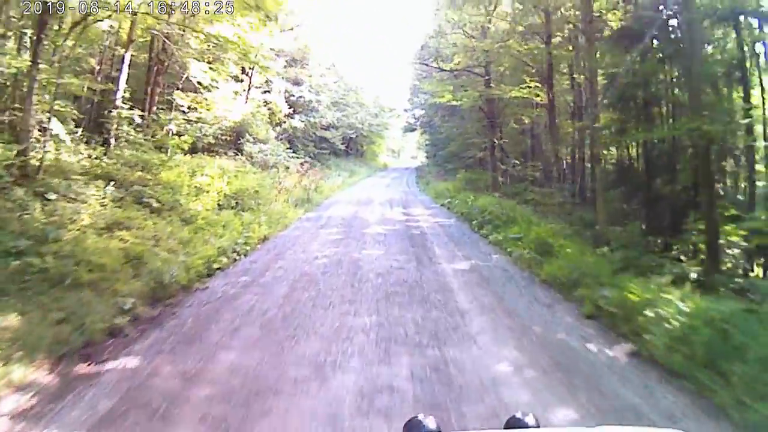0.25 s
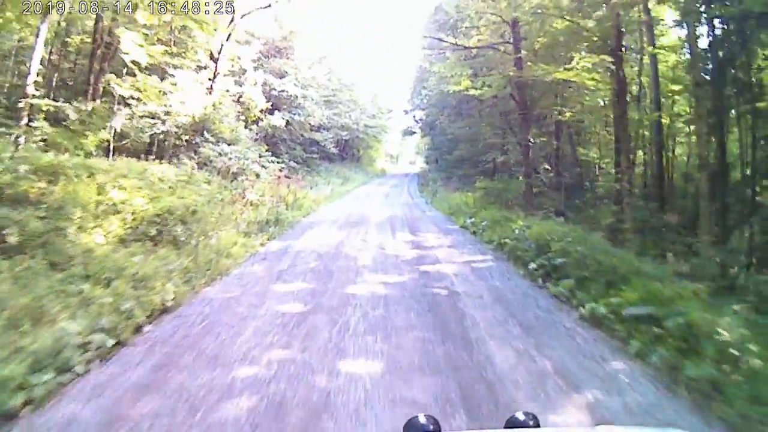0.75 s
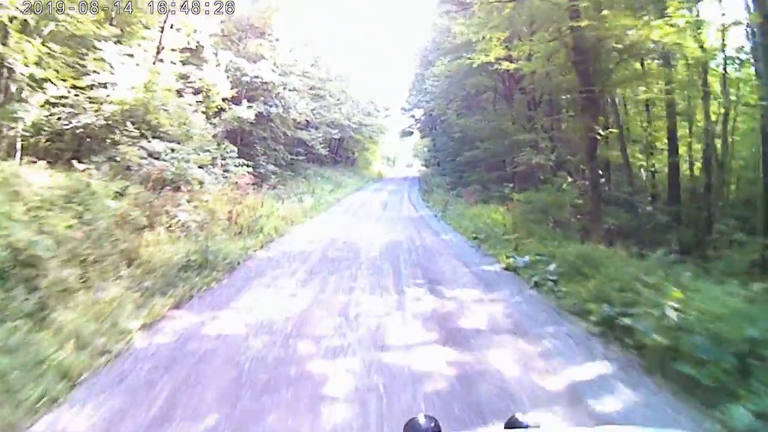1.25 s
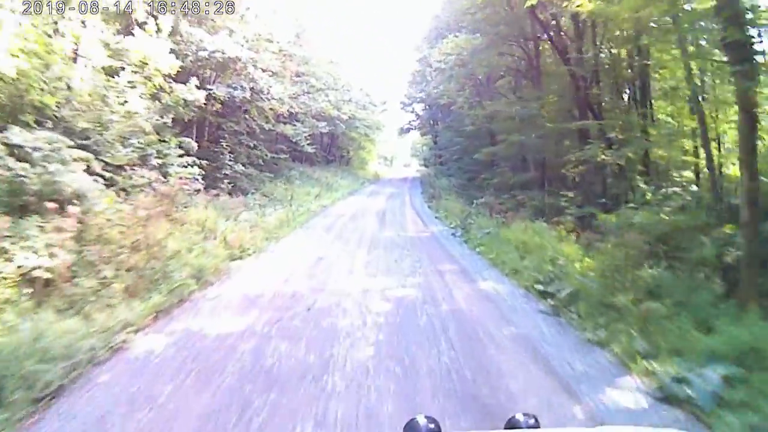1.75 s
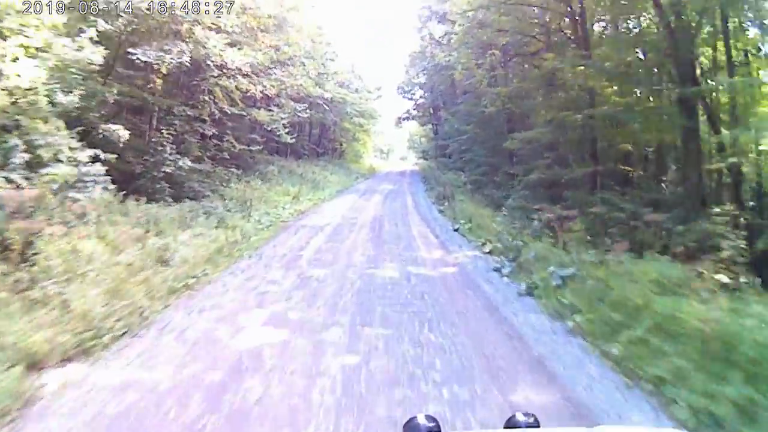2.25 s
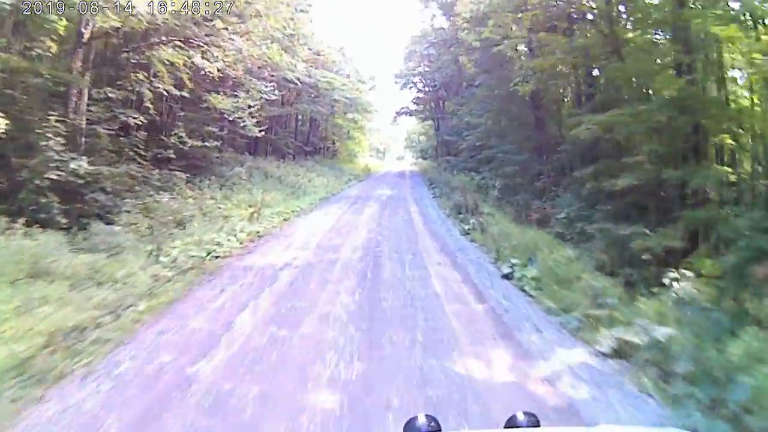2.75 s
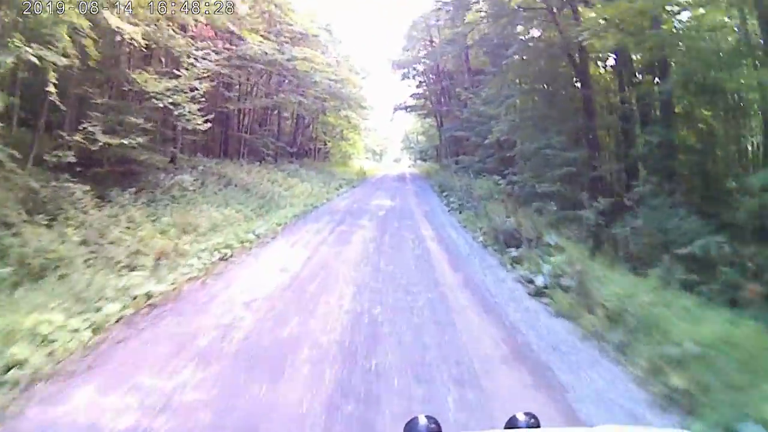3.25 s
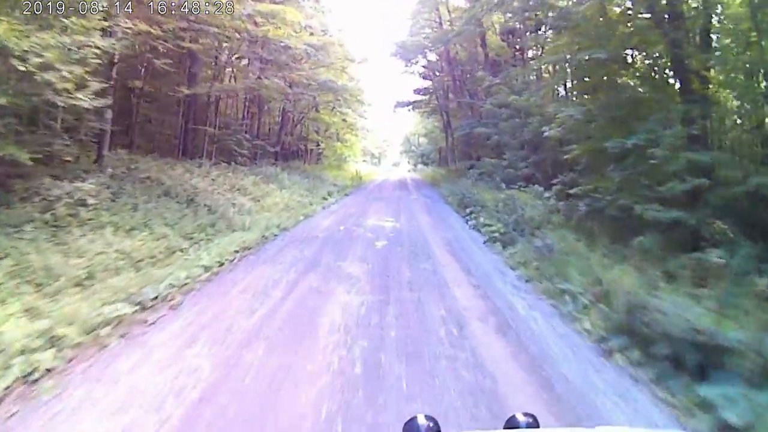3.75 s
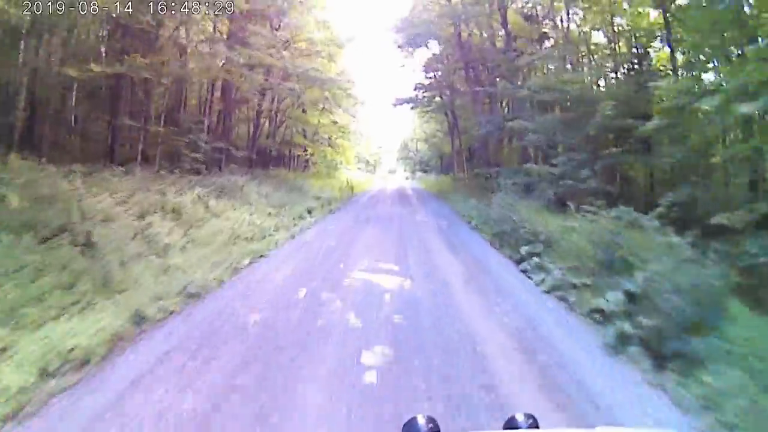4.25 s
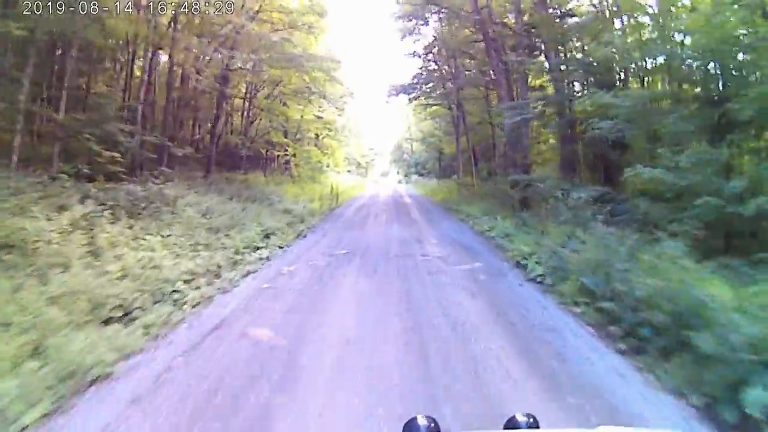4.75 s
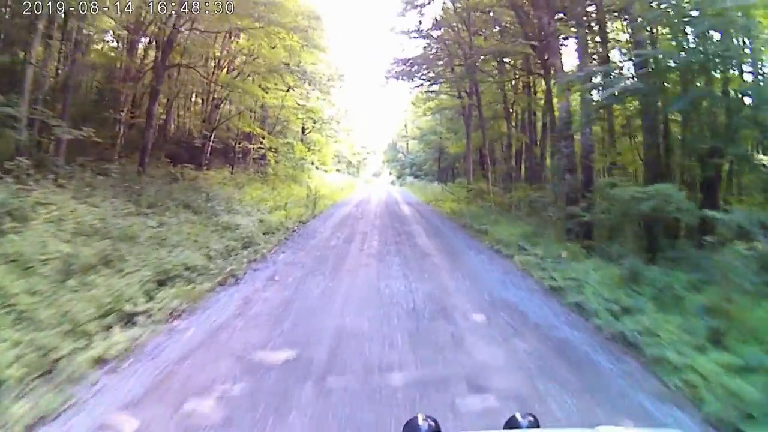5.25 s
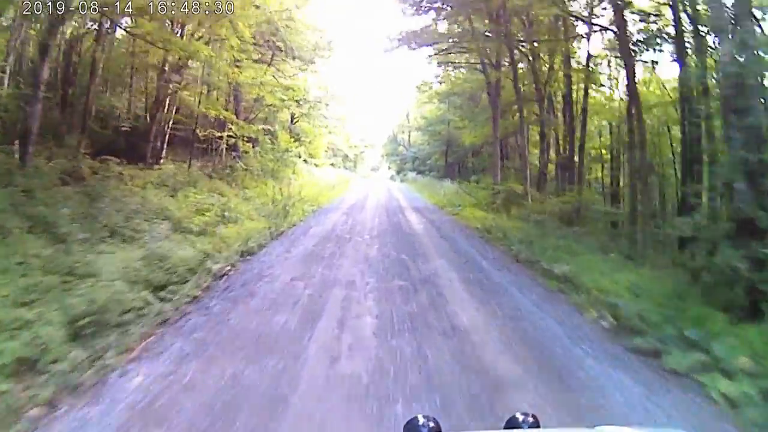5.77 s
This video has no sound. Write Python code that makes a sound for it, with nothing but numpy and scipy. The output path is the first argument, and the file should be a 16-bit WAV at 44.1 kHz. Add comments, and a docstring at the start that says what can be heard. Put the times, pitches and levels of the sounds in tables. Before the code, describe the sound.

Steady gravel-road ride heard from the cabin, with throbbing sub-bass drone, dull thumps from bumps, faint rushing and a loose part ticking close by.

```python
"""Inside a vehicle on a gravel road: the cabin booms near its lowest air mode, a slowly wandering tone.
The rough surface shakes the body: floor, axle and panels filter patchy noise into drone, rumble and rush.
Bumps thud as soft pushes that ring the floor pan; a trim panel knocks as struck, decaying modes.
A small loose part near the microphone ticks, each contact a snap and a short bright ring with two bounces."""
import sys
import numpy as np
from scipy import signal
from scipy.fft import rfft, irfft
from scipy.io import wavfile
from scipy.ndimage import uniform_filter1d

SR = 44100
rng = np.random.default_rng(int(sys.argv[2]) if len(sys.argv) > 2 else 0)


def put_to_file(sound):
    """Save the sound as 16-bit audio at rate SR, in the file named by the first command-line argument."""
    columns = np.atleast_2d(sound).T  # one column per channel
    safe = np.clip(columns, -1, 1)
    whole_steps = np.round(safe * 32767)
    wavfile.write(sys.argv[1], SR, whole_steps.astype(np.int16))


N = 265041
TIME = np.arange(N) / SR  # s
BINS = np.maximum(np.arange(N // 2 + 1) * SR / N, 1)  # Hz, kept above zero for the logarithm

# cabin boom strength: (time [s], level [dB])
BOOM_LEVEL = [(0.0, -28), (0.28, -36), (0.32, -44), (0.62, -27), (0.65, -39), (0.87, -22.5), (0.94, -42),
              (0.99, -22.5), (1.05, -47), (1.12, -23), (1.34, -33), (1.54, -24), (1.82, -28.5), (1.87, -36),
              (1.94, -23), (2.07, -42), (2.13, -23), (2.24, -44), (2.29, -30), (2.69, -26.5), (2.76, -36),
              (3.0, -28.5), (3.05, -39), (3.2, -27), (3.85, -29), (4.37, -21.5), (4.49, -29), (4.54, -22),
              (4.82, -37.5), (5.02, -20.5), (5.09, -36), (5.1, -28.5), (5.47, -23), (5.51, -32),
              (5.82, -22.5), (5.89, -33), (5.96, -24), (6.01, -29)]
# cabin boom pitch: (time [s], frequency [Hz])
BOOM_PITCH = [(0.0, 28), (0.53, 28), (0.67, 34.5), (1.07, 32.5), (1.79, 34.5), (1.92, 31.5), (2.34, 31.5),
              (2.81, 38.5), (3.53, 35.5), (3.98, 37), (4.79, 33.0), (4.92, 38), (5.64, 35.5), (6.01, 35.8)]
# bumps under the wheels: (time [s], peak level [dB], pitch [Hz])
THUDS = [(0.219, -39, 272), (0.276, -26.5, 297), (0.342, -24, 292), (0.455, -47, 269), (0.596, -36, 275),
         (1.148, -21.5, 278), (1.483, -22, 306), (1.765, -44, 318), (2.184, -20, 245), (2.322, -19, 223),
         (2.677, -29, 265.5), (2.742, -31, 323), (3.277, -17.5, 218.5), (3.439, -21, 292.7),
         (3.977, -27, 249), (4.452, -26, 302.5), (4.586, -21.5, 254), (4.634, -17.5, 238),
         (5.114, -18, 292), (5.236, -16.5, 244), (5.709, -23.5, 292.3), (5.839, -26, 313.4),
         (5.905, -51, 299)]
# floor pan modes, rung by the road and by bumps: (frequency [Hz], relative level [dB], t60 [s])
FLOOR_PAN = [(158.5, -6.5, 0.11), (184, -8, 0.12), (209.5, -4, 0.13), (245, -3, 0.15), (265.6, -2, 0.16),
             (286.8, -0.5, 0.14), (321.6, 1.5, 0.14), (344.2, -4.5, 0.11), (369, -8, 0.11),
             (396, -20, 0.086)]
# road roughness as the body passes it on: (time [s], floor drone level [dB], axle rumble level [dB])
ROAD = [(0.0, -39.5, -41), (0.25, -37, -39.5), (0.28, -34, -31.5), (0.44, -43.5, -53), (0.55, -39.5, -45),
        (0.63, -39, -35), (0.84, -39.5, -40.5), (1.19, -35.5, -36.5), (1.25, -37, -41.5),
        (1.96, -39, -36.5), (3.15, -38, -41.5), (3.23, -33, -36.5), (3.65, -36.5, -39.5), (3.83, -30, -36),
        (3.93, -45.5, -43), (3.98, -33.5, -37.5), (4.62, -36.5, -40.5), (4.63, -29, -36),
        (4.7, -36.5, -35.5), (5.04, -29.5, -37.5), (5.56, -37.5, -42), (5.62, -34, -38.5),
        (5.96, -38.5, -40.5), (6.01, -39, -40)]
# trim knocks: (time [s], peak level before padding [dB], centre of the blow's colour [Hz], upper modes [dB])
KNOCKS = [(0.199, -37.5, 991, -11), (0.632, -36, 1340, -8), (0.82, -41, 1360, -5), (1.081, -39, 1350, -1),
          (1.132, -36, 1340, -15), (1.259, -35.5, 1370, -10), (1.401, -31, 1355, -16),
          (1.83, -41.5, 1227, -8), (2.008, -36.5, 1360, -5), (2.588, -39, 1450, -8.5),
          (2.802, -37, 1400, -2), (3.015, -35, 1350, -8), (3.152, -34.5, 1340, -11), (3.24, -35, 1340, -8),
          (3.458, -39, 1350, -11), (3.56, -39, 1340, -25), (3.665, -36.5, 1430, -17),
          (3.776, -36, 1340, -15), (3.809, -41, 1344, -15), (3.915, -36, 1294, -8), (3.985, -28, 1265, -6),
          (4.013, -35, 1330, -8), (4.199, -38, 1410, -7), (4.231, -32, 1440, -13),
          (4.324, -34.5, 1210, -14), (4.369, -35, 1550, 0), (4.507, -32, 1570, -2.5),
          (4.707, -36.5, 1330, -14.5), (4.902, -30.5, 1056, -5.5), (4.94, -29, 1460, -9),
          (4.956, -26.5, 1020, -15), (4.995, -29.5, 930, -15), (5.039, -40, 1340, -16),
          (5.112, -37, 996, -14), (5.151, -35.5, 1430, -11), (5.235, -27.5, 1610, -6),
          (5.315, -48, 1320, -11), (5.444, -38, 1430, -6), (5.491, -37, 1450, -17.5),
          (5.508, -30.5, 1440, -10), (5.578, -34, 1078, -11), (5.591, -28.5, 1340, -15.5),
          (5.67, -27, 1470, -14), (5.682, -35, 1470, -21.5), (5.765, -27, 1320, -8), (5.782, -33, 1350, -8),
          (5.812, -41, 872, -9), (5.858, -41, 1340, -11), (5.98, -40, 1390, -4)]
# lower and upper trim modes: (frequency [Hz], relative level [dB], t60 [s])
TRIM = [(886, -16, 0.056), (1010, 3.5, 0.027), (1142, 0.5, 0.03), (1340, 6.5, 0.051), (1460, 1.8, 0.058),
        (1570, 5.5, 0.031), (1723, 1, 0.049), (1840, -4.5, 0.067)]
TRIM_UPPER = [(2150, 1, 0.013), (2330, 0.4, 0.044), (2820, -6.5, 0.026), (2870, -16, 0.013),
              (3226, -1.5, 0.034)]
# ticks of the loose part: (time [s], peak level of the ring [dB])
TICKS = [(0.0113, -32.5), (0.0907, -39), (0.141, -42), (0.164, -38.5), (0.1755, -39), (0.1967, -31),
         (0.2184, -41), (0.2458, -34), (0.3187, -43), (0.3805, -43), (0.396, -39.5), (0.4234, -39),
         (0.4923, -38), (0.511, -36.5), (0.5404, -41), (0.5511, -40), (0.6414, -33.5), (0.658, -40),
         (0.688, -36.5), (0.7522, -43), (0.7738, -36.5), (1.179, -34), (1.1982, -41), (1.2955, -35.5),
         (1.3733, -39), (1.3945, -30.5), (1.414, -34), (1.4408, -31), (1.475, -40), (1.5034, -32),
         (1.5272, -35.5), (1.5554, -33.5), (1.5928, -40), (1.6164, -31), (1.6392, -35.5), (1.6643, -32.5),
         (1.6814, -41), (1.8748, -31.5), (1.8986, -40), (1.927, -40.5), (2.0966, -33.5), (2.114, -40),
         (2.139, -31), (2.161, -40), (2.2155, -37.5), (2.57, -39.5), (2.587, -36), (2.6131, -37.5),
         (2.6838, -48), (2.7028, -40.5), (2.803, -40), (2.9545, -42), (2.9802, -32), (2.9993, -40),
         (3.031, -39.5), (3.1328, -36.5), (3.2322, -32), (3.2808, -38), (3.3077, -37), (3.3186, -39),
         (3.3448, -30.5), (3.409, -43.5), (3.4552, -33.5), (3.5838, -46), (3.6047, -40.5), (3.6692, -31),
         (3.729, -35.5), (3.7517, -40), (3.7783, -34.5), (3.9231, -34.5), (3.9384, -36.5), (3.9621, -32.5),
         (3.9837, -35), (4.012, -34), (4.0806, -39), (4.104, -33), (4.12, -39), (4.1297, -39.5),
         (4.1559, -31.5), (4.1786, -34), (4.2041, -29.5), (4.3301, -40.5), (4.353, -41), (4.3757, -43),
         (4.4594, -41.5), (4.483, -42), (4.5073, -40), (4.5357, -33), (4.56, -40), (4.636, -41.5),
         (4.6642, -34), (4.762, -46), (4.8531, -33), (4.8796, -40), (4.9053, -36), (4.9231, -37),
         (4.9464, -30), (4.9618, -31), (4.9724, -37), (5.0015, -43), (5.0688, -37.5), (5.0938, -33.5),
         (5.1124, -38), (5.1359, -31), (5.1637, -44), (5.2114, -32), (5.2387, -37), (5.4994, -43),
         (5.5147, -43), (5.6474, -46.5), (5.6585, -39), (5.6819, -31), (5.7087, -42), (5.8138, -34),
         (5.831, -40.5), (5.8576, -40)]
# loose part modes: (frequency [Hz], relative level [dB], t60 [s])
PART = [(2600, 4, 0.0033), (3200, 0.5, 0.0089), (3500, -4.5, 0.013), (4040, -13, 0.013),
        (4640, -7.5, 0.013), (5250, -7.5, 0.012), (5914, -3, 0.02), (6430, -4, 0.0075), (7010, -8.5, 0.013),
        (7700, -3, 0.0058), (8360, -7, 0.0065), (9930, -1.5, 0.008), (10700, -4, 0.0049),
        (11590, -0.5, 0.006), (12200, -12, 0.0021), (12380, -5.5, 0.0041), (13700, -14, 0.0051),
        (13960, -19, 0.0056), (14800, -16, 0.0042), (15300, -23, .005)]
# axle rumble spectrum: (frequency [Hz], relative density [dB per Hz])
AXLE = [(30, -49), (48, 6.5), (65, 4.5), (86, 6.5), (100, 2.5), (112, -17.5), (135, 2.5), (190, -55),
        (500, -120)]
# panel rush spectral slope: (frequency [Hz], relative density [dB per Hz])
PANELS = [(260, -37), (420, 3.5), (800, -7.5), (1400, -2.5), (2100, -9.5), (2720, -12.5), (3810, -22),
          (4240, -20), (5500, -22), (7240, -21.5), (9600, -26), (10800, -34), (13500, -34), (16000, -40)]
# panel resonances on that slope: (frequency [Hz], width [Hz], height above the slope [dB])
PANEL_PEAKS = [(938, 540, 7.4), (1320, 220, 3.5), (1460, 86, 3.8), (1750, 230, 3.1), (2700, 450, 5.94),
               (3430, 250, 6.7), (4236, 630, 8.2), (5040, 530, 7.1), (6020, 180, 8.3), (7130, 390, 6.7),
               (8700, 110, 0.83)]
# panel rush strength: (time [s], level [dB])
RUSH = [(0.0, -51), (0.77, -51.5), (1.42, -49), (1.56, -50.5), (2.53, -50.5), (3.65, -48), (5.74, -48),
        (6.01, -49.5)]

BOOM_DIP_HZ, BOOM_DIP_DB = 14, 3  # rate and depth of the boom's faltering as the road kicks it out of step
SHUDDER_DB = -31  # rms of the slow body shake
PATCH_HZ, DRONE_PATCH_DB, RUMBLE_PATCH_DB = 16, 1.38, 0.7  # coarse and smooth patches of road pass by
RATTLE_S, FAINT_KNOCK_DB = 0.0045, 7.5  # decay of a knock's rattle; most that faint knocks exceed the rush
FLIGHT_S, FLIGHT_SPREAD = 0.0046, 0.16  # mean time to the first bounce and its relative spread
# a hard tick's bounce level; each dB softer lowers the bounce by this many dB more
HARD_TICK_DB, HARD_BOUNCE_DB, BOUNCE_SLOPE = -31.5, -4.5, 1.06
SNAP_DB, SNAP_S = -3, 0.0006  # drive of the unpitched snap before its filter, and its decay
SNAP_BAND_HZ = [3500, 13000]
TOP_HZ = 16450


def boom():
    """Cavity resonance: the lowest air mode of the cabin, a sine of wandering pitch and faltering level."""
    pitch_hz = np.interp(TIME, *np.transpose(BOOM_PITCH)) * (1 + 0.0597 * walk(30))
    phase = 2 * np.pi * np.cumsum(pitch_hz) / SR
    # the cap lets the level dip further than it swells
    falter_db = BOOM_DIP_DB * np.minimum(walk(BOOM_DIP_HZ), 0.3)
    rms_db = np.interp(TIME, *np.transpose(BOOM_LEVEL)) + falter_db
    return np.sqrt(2) * undb(rms_db) * np.sin(phase)


def thuds():
    """Impulse response: each bump jolts the floor pan with a soft push, all its modes in the same sense."""
    out = np.zeros(N)
    push = np.hanning(int(0.0022 * SR))
    for s, db, hz in THUDS:
        gains = near(FLOOR_PAN, hz, 0.29)
        add(out, s, -undb(db) * ring(FLOOR_PAN, gains, push))
    return out


def ticks():
    """Impact and restitution: a bright contact snaps and rings, then bounces twice, weaker and duller."""
    rings, snaps = np.zeros(N), np.zeros(N)
    octaves = np.log2(np.array(PART)[:, 0] / 6000)
    for s, db in TICKS:
        # harder ticks bounce back stronger
        bounce_db = min(HARD_BOUNCE_DB + BOUNCE_SLOPE * (db - HARD_TICK_DB), -1)
        flight = FLIGHT_S * (1 + FLIGHT_SPREAD * rng.standard_normal())
        # each contact: (delay [s], level change [dB], treble tilt [dB per octave])
        contacts = ((0, 0, 0.8), (flight, bounce_db, -2.5), (1.6 * flight, 6.2 * bounce_db, -4))
        for lag, change_db, tilt_db in contacts:
            gains = either_way(PART) * undb(tilt_db * octaves)
            contact_ring = ring(PART, gains, scrape(1.21, 0.00034, 0.0014))
            add(rings, s + lag, undb(db + change_db) * contact_ring)
            add(snaps, s + lag, undb(db + change_db + SNAP_DB) * scrape(0, 0.00015, SNAP_S))
    snap_filter = signal.butter(2, SNAP_BAND_HZ, "band", fs=SR, output="sos")
    return rings + signal.sosfilt(snap_filter, snaps)


def knocks():
    """Modal excitation: blows ring the trim, among many faint rattles that follow the level of the rush."""
    when, size, where = rng.random((220, 3)).T
    when = when * N / SR
    faint_db = np.interp(when, *np.transpose(RUSH)) + FAINT_KNOCK_DB * size
    faint = np.c_[when, faint_db, 1200 + 350 * where, np.full(len(when), -16)]
    modes = TRIM + TRIM_UPPER
    out = np.zeros(N)
    for s, db, hz, upper_db in np.r_[KNOCKS, faint]:
        upper_gains = undb(upper_db) * np.ones(len(TRIM_UPPER))
        gains = np.r_[near(TRIM, hz, 0.24), upper_gains] * either_way(modes)
        add(out, s, undb(db) * ring(modes, gains, scrape(0.93, 0.00017, RATTLE_S)))
    # padded contact: no sharp edge to the blows
    return signal.sosfilt(signal.butter(4, 4200, fs=SR, output="sos"), out)


def body_shudder():
    """Band-limited random vibration: slow shaking of the body, mostly below the boom."""
    band = signal.butter(2, [14, 28], "band", fs=SR, output="sos")
    return level(signal.sosfilt(band, rng.standard_normal(N)), SHUDDER_DB)


def floor_drone():
    """Forced vibration: gravel noise convolved with the floor pan's modal response."""
    response = ring(FLOOR_PAN, either_way(FLOOR_PAN), np.hanning(int(0.0012 * SR)))
    drone = level(signal.fftconvolve(gravel(40, 1.43), response)[:N], 0)
    s, floor_db, _ = np.transpose(ROAD)
    return drone * undb(np.interp(TIME, s, floor_db) + DRONE_PATCH_DB * walk(PATCH_HZ))


def axle_rumble():
    """Low-frequency transmission: gravel noise takes on the spectrum of the axle."""
    rumble = colour(gravel(25, 0.38), AXLE)
    s, _, axle_db = np.transpose(ROAD)
    return rumble * undb(np.interp(TIME, s, axle_db) + RUMBLE_PATCH_DB * walk(PATCH_HZ))


def panel_rush():
    """Broadband panel radiation: gravel noise on a spectral slope with resonances standing out."""
    rush = colour(gravel(60, 1.58), PANELS, PANEL_PEAKS)
    return rush * undb(np.interp(TIME, *np.transpose(RUSH)))


def gravel(rate, patchy_db):
    """Random excitation: stones pass under the tyres in uneven patches, as noise of fluttering strength."""
    return rng.standard_normal(N) * undb(patchy_db * walk(rate))


def ring(modes, gains, push):
    """Modal superposition: decaying sines set going by a force pattern; peak 1."""
    hz, db, t60 = np.transpose(modes)[:, :, None]
    t = np.arange(int(t60.max() * SR)) / SR
    decay = np.exp(-np.log(1000) * t / t60)
    tones = np.sin(2 * np.pi * hz * t) * decay
    response = (gains[:, None] * undb(db) * tones).sum(axis=0)
    y = signal.fftconvolve(response, push)
    return y / np.abs(y).max()


def scrape(blow, rise_s, fall_s):
    """Contact force: a first blow, with many tiny random pushes that swell and die away."""
    t = np.arange(int(0.04 * SR)) / SR
    envelope = (1 - np.exp(-t / rise_s)) * np.exp(-t / fall_s)
    pushes = rng.standard_normal(len(t)) * envelope
    return pushes / np.sqrt(np.sum(pushes ** 2)) + blow * (t == 0)


def near(modes, hz, spread):
    """Modal participation: where a thing is struck decides which neighbouring modes speak."""
    return np.exp(-(np.log(np.array(modes)[:, 0] / hz) / spread) ** 2)


def either_way(modes):
    """Modal phase: neighbouring modes move in opposite senses at most points of a plate."""
    return (-1.) ** np.arange(len(modes))


def colour(x, spectrum, peaks=()):
    """Linear filtering: shapes x by spectral points with resonant humps on top; rms 1."""
    hz, db = np.transpose(spectrum)
    shape_db = np.interp(np.log(BINS), np.log(hz), db)
    for f, width, top in peaks:
        shape_db = shape_db + top / (1 + (2 * (BINS - f) / width) ** 2)
    return level(irfft(rfft(x) * undb(shape_db), N), 0)


def walk(rate):
    """Slow random modulation: values held 1 / rate s and smoothed by two moving averages; spread near 1."""
    k = int(SR / rate)
    steps = np.repeat(rng.standard_normal(N // k + 1), k)
    return 1.378 * uniform_filter1d(uniform_filter1d(steps, k), k)[:N]


def undb(db):
    """Decibel law: amplitude ratio of a level in dB."""
    return 10 ** (np.asarray(db) / 20)


def level(x, db):
    """Root-mean-square normalisation: scales x to an rms level in dB."""
    return x * undb(db) / np.sqrt(np.mean(x ** 2))


def add(out, s, y):
    """Linear superposition: adds y to out from time s, cut at the end."""
    i = int(s * SR)
    out[i:i + len(y)] += y[:N - i]


def scene():
    """Superposition of all sources at one point, as a single channel."""
    events = thuds() + ticks() + knocks()
    background = body_shudder() + floor_drone() + axle_rumble() + panel_rush()
    return (boom() + events + background)[None]


def record(dry):
    """Band limitation: a steep elliptic low-pass cuts the top."""
    return signal.sosfilt(signal.ellip(12, 0.2, 80, TOP_HZ, fs=SR, output="sos"), dry)


dry = scene()
out = record(dry)
put_to_file(out)
```